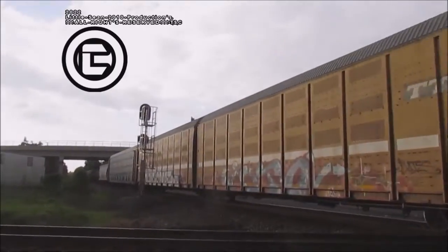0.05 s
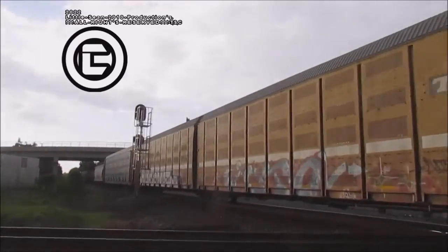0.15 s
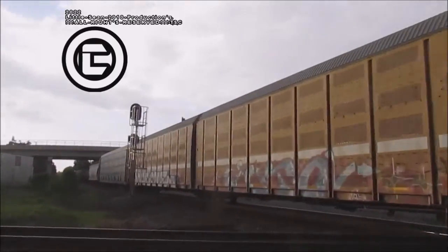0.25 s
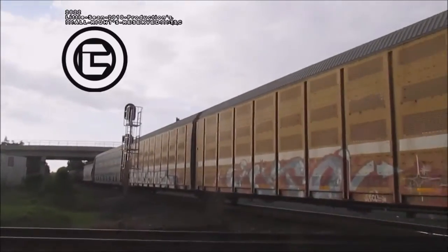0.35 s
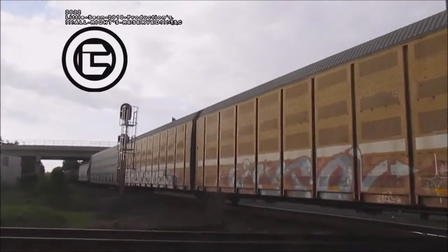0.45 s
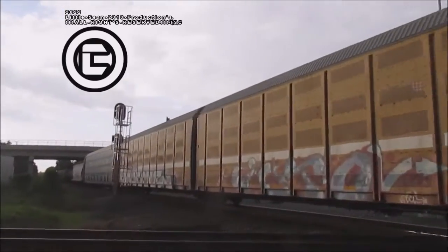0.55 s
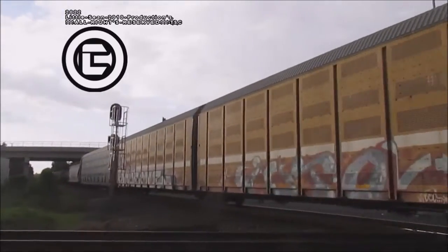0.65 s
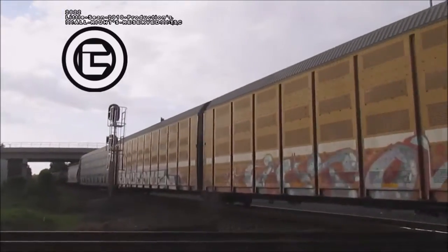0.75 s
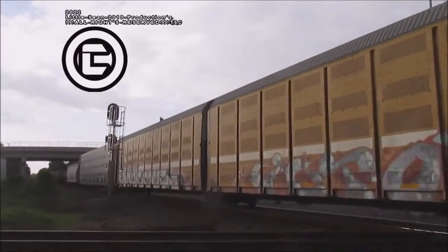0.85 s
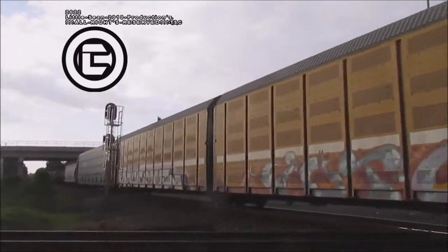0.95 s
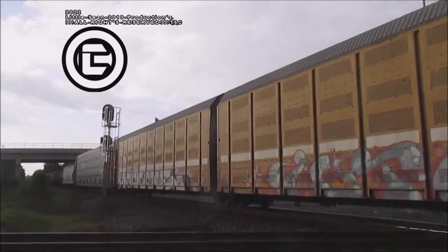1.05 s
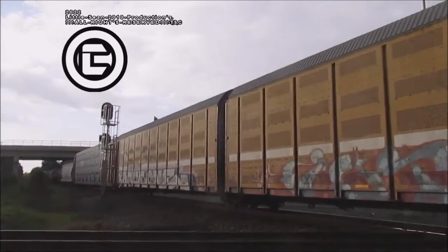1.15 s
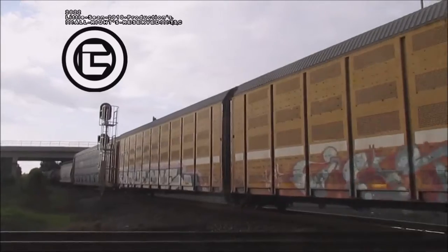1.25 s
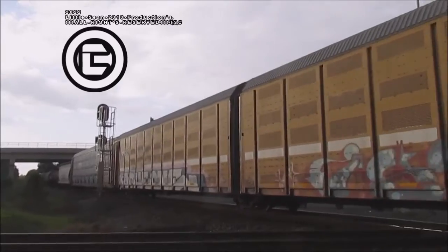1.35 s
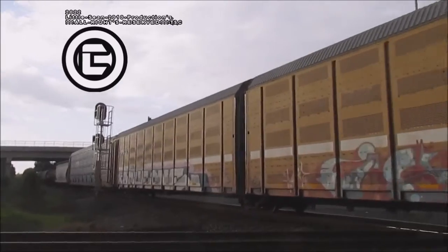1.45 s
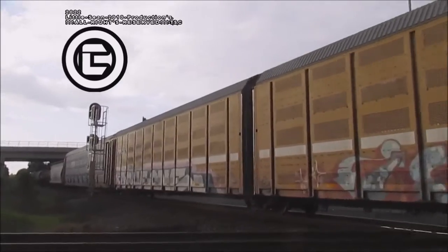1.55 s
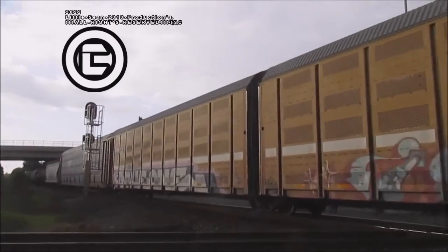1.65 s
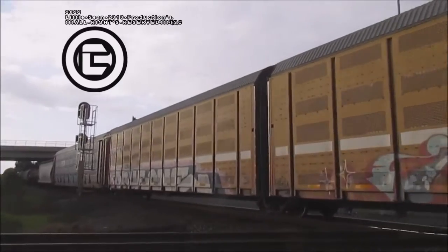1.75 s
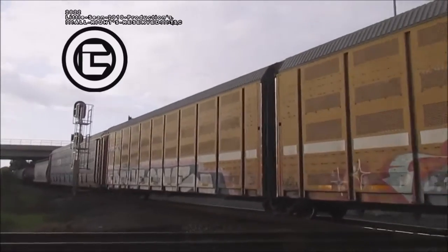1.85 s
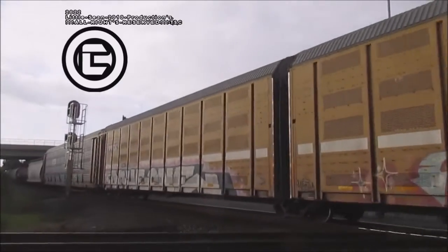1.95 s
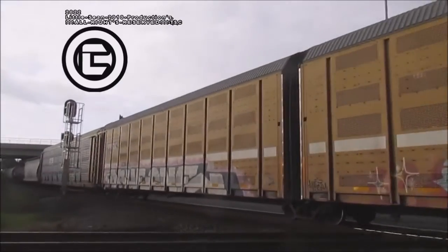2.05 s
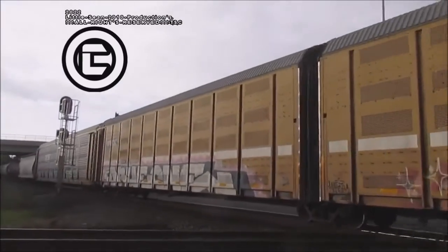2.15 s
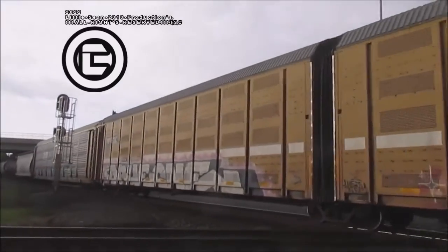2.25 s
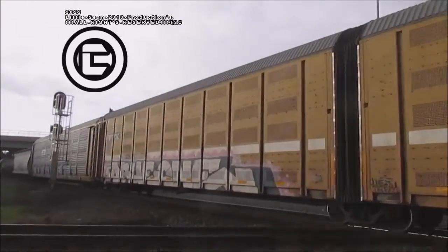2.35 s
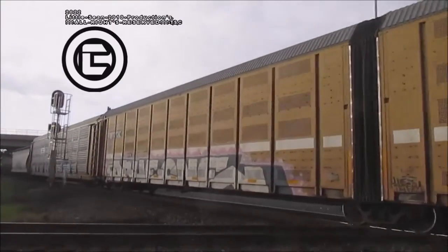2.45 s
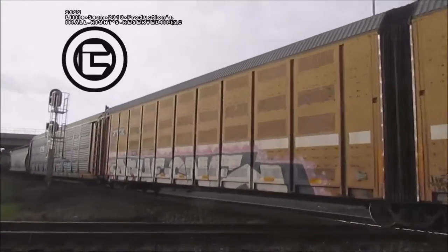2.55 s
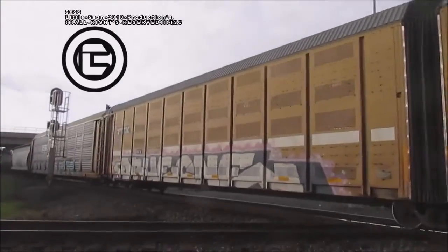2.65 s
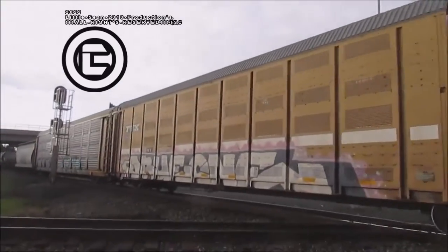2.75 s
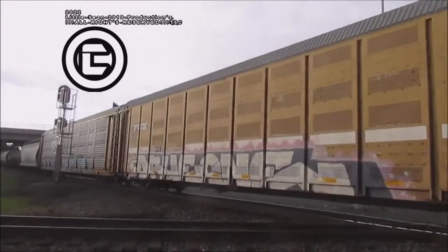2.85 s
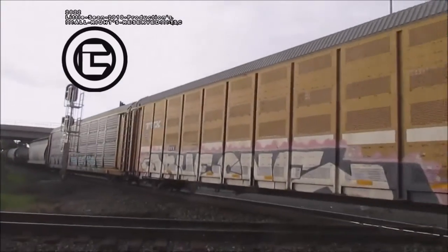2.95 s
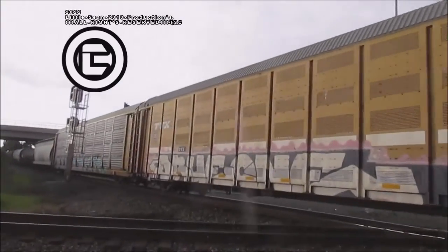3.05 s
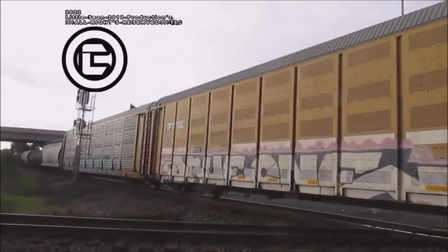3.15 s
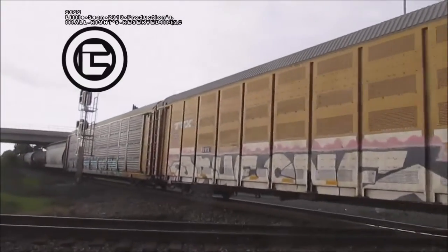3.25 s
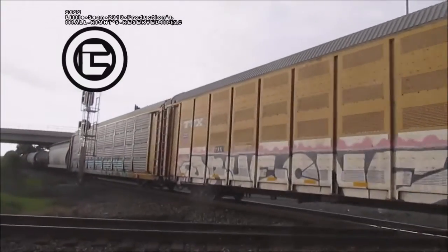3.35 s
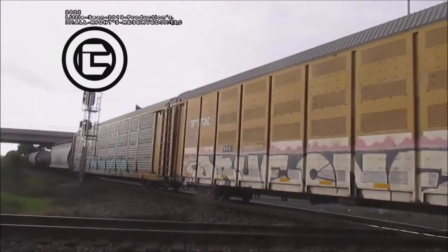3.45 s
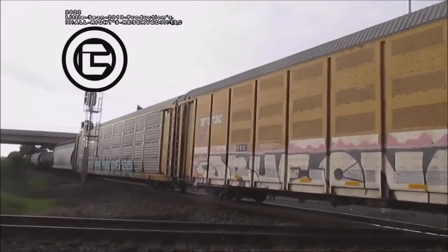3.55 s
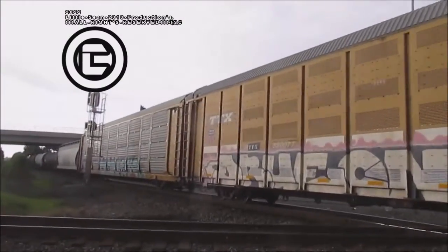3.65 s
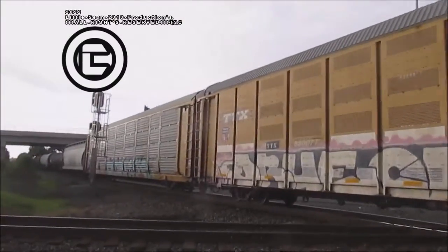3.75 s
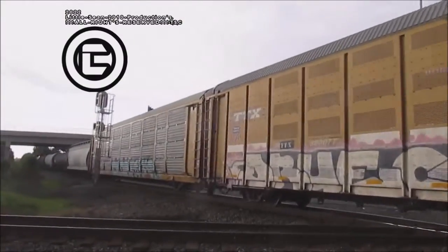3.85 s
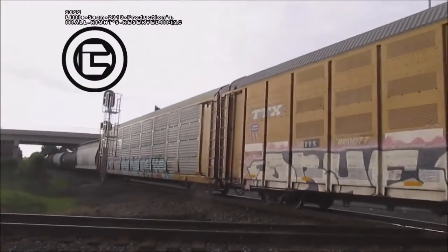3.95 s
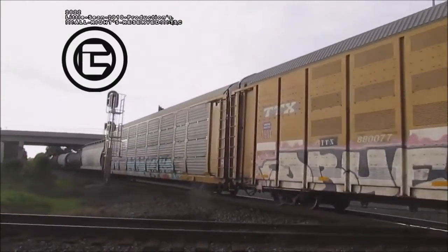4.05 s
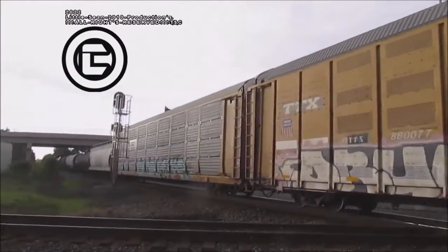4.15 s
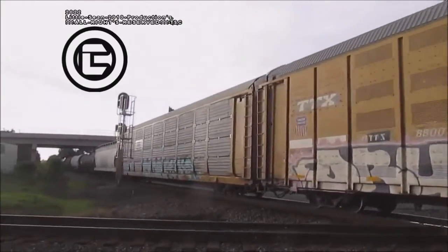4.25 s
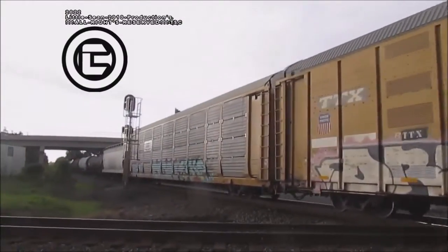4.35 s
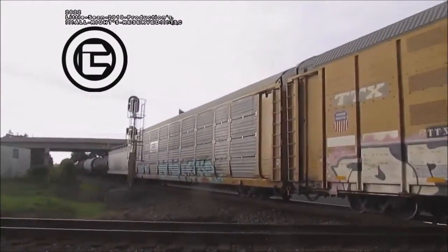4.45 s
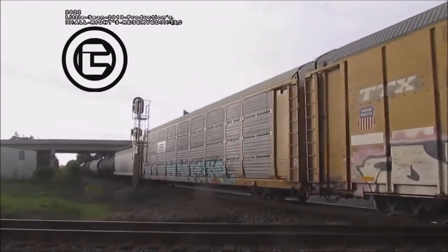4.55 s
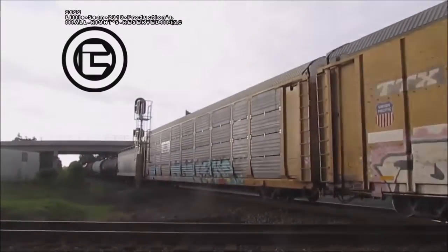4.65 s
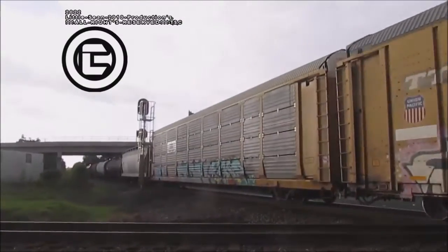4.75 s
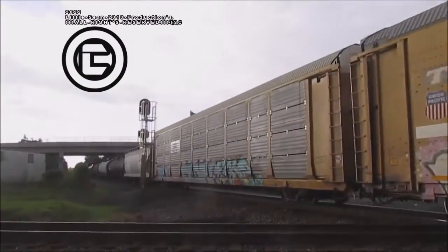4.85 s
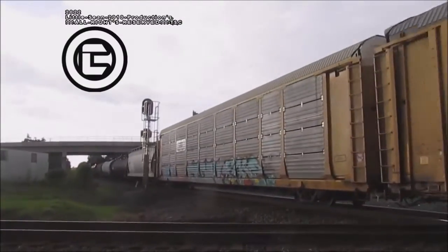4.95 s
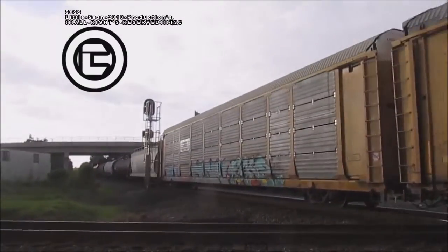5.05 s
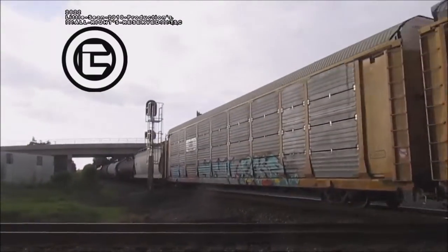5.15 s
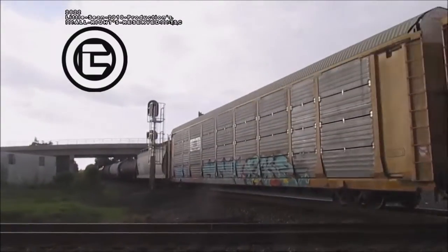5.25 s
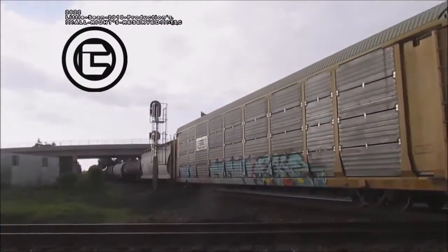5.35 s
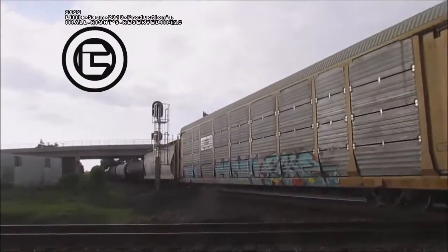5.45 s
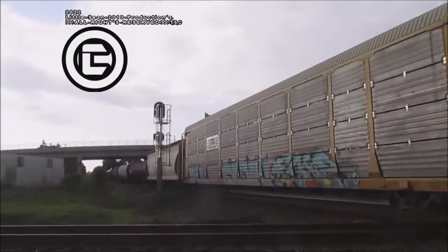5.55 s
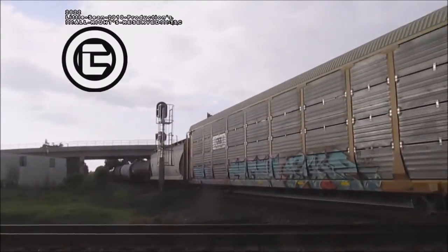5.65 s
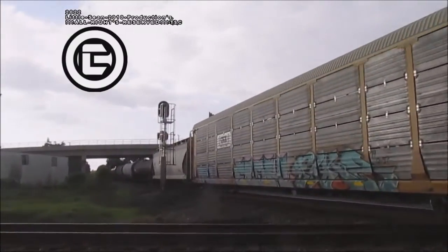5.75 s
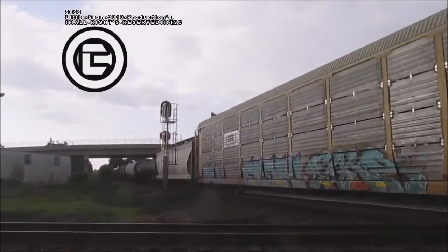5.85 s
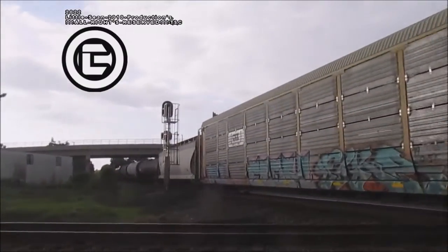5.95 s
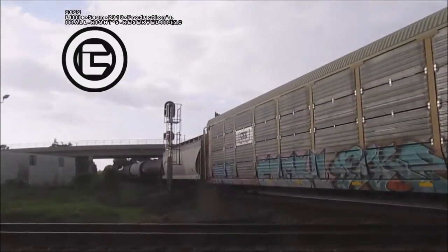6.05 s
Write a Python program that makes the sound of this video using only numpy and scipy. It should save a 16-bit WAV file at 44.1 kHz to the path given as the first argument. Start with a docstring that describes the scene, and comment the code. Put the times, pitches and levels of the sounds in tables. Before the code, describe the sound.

Close freight wagons rumble by outdoors, steel wheels clanging over rail gaps in repeated bursts, with screeching flanges and light chain rattles.

```python
"""A freight train of tall car carriers rolls over a rail crossing a few metres away.
Each group of bogies announces itself with a scrape of flanges sticking and slipping on the rail,
then its wheels hammer over the rail gaps: wagons thud, frames clang, the crossing rings.
Between the groups the wagons rumble on and push a deep swell of air; chains and grit rattle.
Two closely spaced microphones hear it from the right."""
import sys
import numpy as np
from scipy import signal
from scipy.fft import rfft, irfft, next_fast_len
from scipy.io import wavfile
from scipy.ndimage import map_coordinates

SR = 44100
rng = np.random.default_rng(int(sys.argv[2]) if len(sys.argv) > 2 else 0)


def put_to_file(sound):
    """Save the sound as 16-bit audio at rate SR, in the file named by the first command-line argument."""
    columns = np.atleast_2d(sound).T  # one column per channel
    safe = np.clip(columns, -1, 1)
    whole_steps = np.round(safe * 32767)
    wavfile.write(sys.argv[1], SR, whole_steps.astype(np.int16))


N = 269010
TIME = np.arange(N) / SR
FFT_SIZE = next_fast_len(N, real=True)
FREQS = np.maximum(np.arange(FFT_SIZE // 2 + 1) * SR / FFT_SIZE, 1)

# a pair of coupled bogies rolls by: (arrives [s], leaves [s], wheel roar [dB], rail hiss [dB])
BOGIE_PASSES = [(0.0, 0.523, -27.5, -36), (2.394, 2.94, -26, -29.5), (4.79, 5.268, -21.5, -28),
                (5.8, 6.1, -25.5, -26.5)]
# how hard the wagons shake: (time [s], level [dB])
WAGON_SHAKING = [(0.0, -25), (0.37, -22.5), (0.95, -31), (2.04, -34.5), (2.58, -21), (3.31, -28),
                 (4.21, -30), (4.99, -21.5), (5.64, -24), (6.1, -26.5)]
# steel knocks on a bogie frame: (time [s], lowest mode [Hz], level [dB], rail ring [dB])
FRAME_KNOCKS = [(0.002, 614, -16, -22), (0.107, 613, -15.5, -28), (0.192, 548, -13, -28),
                (0.222, 745, -27, -24), (0.323, 746, -14, -28), (0.331, 700, -12.5, -28),
                (0.423, 700, -25, -28), (0.445, 640, -20, -30), (0.534, 730, -22, -22),
                (0.553, 726, -14.5, -33), (2.334, 650, -20, -22.5), (2.432, 650, -20, -40),
                (2.558, 830, -19, -21), (2.588, 616, -18, -32), (2.644, 720, -14, -34),
                (2.767, 650, -20, -25), (2.868, 678, -9, -25), (2.897, 690, -19, -27),
                (4.342, 1290, -26, -50), (4.4, 1275, -25, -39), (4.704, 690, -23, -20),
                (4.918, 650, -20, -23), (4.944, 784, -18, -19), (5.022, 680, -20, -24),
                (5.149, 614, -17, -28), (5.261, 710, -12, -38), (5.786, 660, -14, -24),
                (5.884, 610, -23, -29), (5.902, 700, -16, -30), (5.995, 606, -18, -21)]


def from_db(db):
    """Decibels to gain."""
    return 10 ** (np.asarray(db) / 20)


def unit_rms(x):
    """Scale to an rms of 1."""
    return x / np.sqrt(np.mean(x ** 2) + 1e-20)


def over_hz(points):
    """Read a (frequency, value) curve along a log-frequency axis."""
    hz, value = np.transpose(points)
    return np.interp(np.log(FREQS), np.log(hz), value)


def colour(points):
    """Gain of an EQ curve, rolling off beyond its ends."""
    inside = np.minimum(FREQS / points[0][0], 1) * np.minimum(points[-1][0] / FREQS, 1)
    return from_db(over_hz(points)) * inside ** 2


def resonances(modes):
    """Power gain of a set of (frequency, width, level) peaks."""
    return sum(from_db(db) ** 2 / (1 + (2 * (FREQS - hz) / width) ** 2) for hz, width, db in modes)


def steel(ripple_db, spacing_hz):
    """Large steel parts have crowds of narrow modes: a rippled EQ that flattens out in the bass."""
    knots = np.cumsum(rng.uniform(.5, 1.5, 4000)) * spacing_hz
    ripple = np.interp(FREQS, knots, np.minimum(rng.standard_normal(4000), 2.5))
    return from_db(ripple_db * ripple * np.minimum(FREQS / 600, 1))


def drift(rate_hz):
    """Smooth random modulation of rms 1."""
    smooth = irfft(rfft(rng.standard_normal(FFT_SIZE)) / (1 + (FREQS / rate_hz) ** 2))
    return unit_rms(smooth[:N])


def stereo_noise(gain):
    """Coloured noise of rms 1 at the two microphones, wider in the treble."""
    # likeness of left and right: (frequency [Hz], correlation [0-1])
    likeness = [(30, .88), (200, .92), (700, .89), (1300, .8), (2600, .73), (4500, .54), (8000, .45),
                (15000, .25)]
    alike = np.clip(over_hz(likeness), 0, .99)
    mid, side = rng.standard_normal((2, 2 * len(FREQS))).view(complex)   # two white spectra
    mid, side = mid * (gain * np.sqrt(1 + alike)), side * (gain * np.sqrt(1 - alike))
    return unit_rms(irfft(np.array([mid + side, mid - side], np.complex64))[:, :N])


def swell(start, rise, hold, t60):
    """Envelope that rises, holds, then dies away exponentially; times in seconds."""
    out = np.zeros(N)
    live = slice(*np.searchsorted(TIME, [start, start + rise + hold + t60]))
    age = TIME[live] - start
    out[live] = np.clip(age / rise, 0, 1) * from_db(-60 * np.maximum(age - rise - hold, 0) / t60)
    return out


def chatter(per_s, t60, share):
    """Loose parts knock at random: a gain of rms 1, small sharp bursts over a steady bed."""
    ticks = (rng.random(N) < per_s / SR) * np.minimum(rng.exponential(1, N), 3) ** 2
    power = signal.lfilter([1], [1, -from_db(-120 / (t60 * SR))], ticks + 1e-18)
    return np.sqrt(1 - share + share * power / power.mean())


def ring(clicks, hz, t60):
    """One mode: a unit click sets a sine of height 1 ringing."""
    radius, angle = from_db(-60 / (t60 * SR)), 2 * np.pi * hz / SR
    poles = [1, -2 * radius * np.cos(angle), radius * radius]
    return signal.lfilter([0, np.sin(angle)], poles, clicks + 1e-18)


def struck(start, hz, rise, t60):
    """A heavy part, hit once, swings as a damped sine."""
    out = swell(start, rise, 0, t60)
    live = np.flatnonzero(out)
    out[live] *= np.sin(2 * np.pi * hz * (TIME[live] - start))
    return out


def roar_envelope(speed_m_per_s=21.5, distance_m=1.344, spreading=0.83):
    """The wheel roar is full while a pair of bogies is abreast and fades with its distance."""
    power = 0
    for arrives, leaves, db, _ in BOGIE_PASSES:
        along_m = speed_m_per_s * (TIME - np.clip(TIME, arrives, leaves))
        nearness = distance_m / np.hypot(distance_m, along_m)
        power += (from_db(db) * nearness ** spreading) ** 2
    return np.sqrt(power)


def hiss_envelope(rise_db_per_s=78, fall_db_per_s=18, floor_db=-72):
    """The rail carries its hiss a little ahead of each pair of bogies and far behind it."""
    power = from_db(floor_db) ** 2
    for arrives, leaves, _, db in BOGIE_PASSES:
        ahead_db = rise_db_per_s * np.maximum(arrives - TIME, 0)
        behind_db = fall_db_per_s * np.maximum(TIME - leaves, 0)
        power += from_db(db - ahead_db - behind_db) ** 2
    return np.sqrt(power)


def rolling(rumble_db, roar_db, hiss_db, waver_db=1.1):
    """Rough treads on rough rail: the wagons rumble, the wheels roar, the worn rail hisses unevenly."""
    # tone of wagons, wheels and rail: (frequency [Hz], level [dB])
    rumble_eq = [(42, -7.5), (58, -2), (105, 0), (150, -3.5), (250, -4), (320, -6.5), (430, -16),
                 (900, -21.5)]
    roar_eq = [(250, -45), (420, -3.5), (680, 3), (1000, -5.5), (1300, -4), (1700, -5), (2600, -10),
               (4000, -10.5), (6000, -23), (10000, -30)]
    hiss_eq = [(2000, 9.5), (4000, 11.5), (6500, 7.5), (8000, 7.5), (10300, 9.5), (12500, 2.5),
               (15500, -11)]
    shaking_db = np.interp(TIME, *np.transpose(WAGON_SHAKING))
    rail = steel(ripple_db=2.4, spacing_hz=28)
    rumble = from_db(shaking_db + rumble_db) * stereo_noise(colour(rumble_eq))
    roar = roar_envelope() * from_db(roar_db) * stereo_noise(colour(roar_eq) * rail)
    roar *= chatter(per_s=63, t60=0.056, share=0.13)
    hiss = hiss_envelope() * from_db(hiss_db) * stereo_noise(colour(hiss_eq) * rail)
    hiss *= chatter(per_s=70, t60=0.14, share=0.22)
    return rumble + roar + hiss * from_db(waver_db * drift(16))


def draught(sway_db, gust_db, follows=0.36):
    """The shaking wagon sides push a slow, deep swell of air; an open wagon end adds a gust."""
    # sub-bass of the moving air: (frequency [Hz], level [dB])
    air_eq = [(16, -19), (26, -2), (38, 17), (48, -12)]
    shaking_db = np.interp(TIME, *np.transpose(WAGON_SHAKING))
    sway = from_db(sway_db + follows * (shaking_db - shaking_db.mean()))
    gust = from_db(gust_db) * swell(start=4.57, rise=0.45, hold=0.18, t60=2.3)
    return np.hypot(sway, gust) * stereo_noise(colour(air_eq))


def far_wagons():
    """The long line of wagons further off booms, swelling and sinking slowly."""
    # tone of the boom: (frequency [Hz], level [dB])
    boom_eq = [(45, 0), (70, -1.5), (120, -3.5), (160, -13.5)]
    # its rise and fall: (time [s], level [dB])
    boom_levels = [(0.0, -43), (0.8, -46), (1.4, -43.5), (2.25, -32), (3.0, -38), (3.7, -33.5), (4.4, -36),
                   (5.0, -45), (6.1, -34)]
    return from_db(np.interp(TIME, *np.transpose(boom_levels))) * stereo_noise(colour(boom_eq))


def fittings(level_db, per_s, t60):
    """Chains and brake rigging tick and jingle, the harder the louder the rail hisses."""
    # modes of small loose steel parts: (frequency [Hz])
    pitches = [3900, 4300, 4700, 5100, 5600, 6100, 6700, 7300, 8300, 8700, 9100, 9500, 9900, 10400, 10900,
               11700, 12600, 13500, 14400]
    at = np.flatnonzero(rng.random(N) < per_s / SR)
    force = rng.uniform(.3, 1, len(at))
    out = np.zeros((2, N))
    for hz in pitches:
        clicks = np.zeros((2, N))
        clicks[:, at] = force * rng.standard_normal((2, len(at)))
        out += ring(clicks, hz, t60)
    return unit_rms(out) * hiss_envelope() * from_db(level_db)


def wheel_singing(waver_hz, flutter_db, sharp_hz=30, settle_s=.015):
    """Stick and slip keeps one wheel mode going: an almost pure tone that starts sharp and settles."""
    # a wheel locks into a mode: (start [s], hold [s], pitch [Hz], level [dB])
    notes = [(0.008, 0.042, 2914, -28.5), (0.0, 0.072, 3640, -35), (0.02, .11, 12100, -49),
             (0.57, .04, 3320, -42), (1.32, 0.14, 12000, -68), (2.252, 0.04, 2978, -26.5),
             (2.314, 0.08, 2960, -32), (2.358, 0.052, 2000, -32), (2.366, .1, 3195, -42),
             (2.444, 0.13, 3910, -39), (2.517, 0.052, 2965, -27.5), (2.56, 0.1, 9200, -38),
             (2.56, 0.079, 10230, -36), (2.7, 0.039, 3180, -31), (2.765, .09, 3310, -35),
             (2.768, 0.044, 2450, -35), (2.888, 0.044, 3400, -37), (4.577, 0.014, 3220, -30),
             (4.622, .02, 1825, -29.5), (6.01, .08, 11200, -40), (6.02, .08, 10740, -36.5)]
    waver_cycles = np.cumsum(waver_hz * drift(48)) / SR
    tones = np.zeros(N)
    for start, hold, hz, db in notes:
        envelope = swell(start, rise=0.0039, hold=hold, t60=0.15)
        live = envelope > 0
        pitch = hz + sharp_hz * np.exp((start - TIME[live]) / settle_s)
        cycles = np.cumsum(pitch) / SR + waver_cycles[live]
        tones[live] += from_db(db) * envelope[live] * np.sin(2 * np.pi * cycles)
    return np.sqrt(2) * tones * from_db(flutter_db * drift(50))


def blow_envelope(hits, levels_db, t60, rebound_s=0.024):
    """Each wheel drops into the gap, then rebounds onto the far rail end."""
    power = np.zeros(N)
    for (start, *_, rise, rebound_db), db in zip(hits, levels_db):
        ring_s = t60 * from_db(0.26 * (db - levels_db.max()))   # light blows die sooner
        power += (from_db(db) * swell(start, rise, 0, ring_s)) ** 2
        power += (from_db(db + rebound_db) * swell(start + rebound_s, rise, 0, ring_s)) ** 2
    return np.sqrt(power)


def frame_ring(times, levels_db, modes, lag_s=0.01188, scatter_db=1.5):
    """Just after a wheel drops, the frame's low modes ring, each with a strength of its own."""
    at = np.clip((times + lag_s) * SR, 0, N - 1).astype(int)
    scatter = scatter_db * rng.standard_normal((len(at), len(modes)))
    out = np.zeros(N)
    for k, (hz, db, t60) in enumerate(modes):
        clicks = np.zeros(N)
        clicks[at] = from_db(levels_db + db + scatter[:, k])
        out += (-1) ** k * ring(clicks, hz, t60)
    return out


def wheel_strikes(thud_db, clang_db, crack_db, panel_db, frame_db):
    """A blow thuds in the wagon, clangs in its bogie and the side panels, cracks in wheel and rail."""
    # wheels drop into the gaps: (time [s], clang [dB], thud [dB], crack [dB], rise [s], rebound [dB])
    drops = [(0.001, -15, -16, -25, 0.00069, -7.5), (0.093, -16, -19, -28.5, .004, -8),
             (0.192, -12.5, -16, -23.5, .003, -2.5), (0.299, -14.5, -18.5, -29, 0.0071, -1),
             (0.418, -16, -16, -27, 0.0051, -6), (0.52, -14.5, -13.5, -29.5, .01, -5.5),
             (1.244, -46, -36.5, -72, .003, -8), (1.972, -34, -30, -53, 0.0033, 1),
             (2.033, -31, -25, -43.5, 0.0052, -6), (2.328, -12, -16.5, -23, .005, -13),
             (2.427, -15, -18.5, -26.5, 0.0057, 0), (2.531, -13.5, -15, -25.5, 0.0054, 0.5),
             (2.636, -12.5, -21, -24.5, 0.0062, -3), (2.759, -15, -16.5, -26, 0.0085, -2.5),
             (2.868, -14, -15.5, -26, 0.0032, -1), (3.236, -31.5, -21.5, -41, 0.0065, -3),
             (3.642, -38, -28.5, -54, 0.0044, -5), (4.152, -33.5, -33, -43.5, 0.016, 2),
             (4.342, -24, -25.5, -57, .003, -9), (4.399, -22.5, -21.5, -39.5, 0.0026, -5),
             (4.698, -10, -10.5, -22.5, 0.0037, -11), (4.805, -17.5, -15.5, -27, .008, -5),
             (4.91, -13.5, -22, -21, 0.0048, -3.5), (5.016, -12.5, -16, -24.5, 0.0086, -0.5),
             (5.148, -16.5, -18, -25, 0.0036, -5), (5.255, -15.5, -26, -26.5, .008, -4),
             (5.773, -13, -19, -23.5, 0.0054, -16), (5.881, -11, -15.5, -28, 0.0026, -17),
             (5.986, -11, -13, -24, 0.0063, -2.5), (6.089, -10, -31, -28, 0.0088, -5)]
    # tone of thud, side panels, crack and the whole clang: (frequency [Hz], level [dB])
    thud_eq = [(35, -5), (70, -7), (110, 1.5), (190, 4.5), (280, -2.5), (400, -16), (600, -28)]
    panel_eq = [(250, -27), (420, -1), (650, 0), (800, 2), (1000, -9.5), (1300, 1.5), (1600, -11),
                (2000, -6), (3200, -57), (6000, -10)]
    crack_eq = [(1000, -63), (2200, 0.5), (3500, 2), (5200, 0), (8000, -6), (10000, -5), (12500, -9),
                (15500, -22)]
    clang_eq = [(400, -1.3), (580, -1), (2500, -1.5), (4500, 0.14)]
    # clang resonances of each pair of bogies: (frequency [Hz], width [Hz], level [dB])
    first_pair = [(570, 200, 1.5), (1133, 56, 0), (1750, 120, -5), (2380, 42, -22), (2780, 120, -5),
                  (3220, 130, -4)]
    second_pair = [(650, 94, 5), (875, 21, 2.5), (1290, 180, 0), (1830, 110, -0.5), (2000, 36, -10),
                   (2480, 60, -7), (3000, 24, -8), (3180, 40, -3), (4060, 80, -9.5)]
    third_pair = [(700, 220, -3), (1080, 40, -13), (1290, 52, -1), (1750, 200, -4.5), (2000, 71, -4),
                  (2440, 110, -1), (2590, 79, -14), (3360, 79, -11)]
    fourth_pair = [(670, 180, -8), (1230, 49, -14), (2080, 140, -3.5), (3250, 56, -6)]
    # low modes of frame and wagon floor, pair by pair: (frequency [Hz], level [dB], t60 [s])
    low_modes = [
        [(98, -8, 0.11), (165, -13, 0.26), (206.5, -4.5, 0.22), (299, -6, 0.5), (630, -16, 1),
         (690, -13.5, 0.98), (774, -13, 0.18)],
        [(85, -14, 0.44), (134, 6, 0.042), (192, 1, 0.046), (265.6, -7, 0.45), (557, -14, 0.17),
         (606, -36, 0.15), (740, -36, 0.13)],
        [(78, 4, 0.082), (124, -16, 0.33), (164, -1, 0.11), (242, -28, 0.23), (280.6, -1.5, 0.25),
         (557, -10, 0.16), (716, -28, 0.22)],
        [(72, -27, 0.18), (124, -7, 0.24), (157, -4, 0.13), (188.3, -1, 0.58), (249, -3, 0.54),
         (305, -8.5, 0.46), (523, -13, 0.48)],
    ]
    # the next pair takes over the crossing: (time [s])
    handovers = [1.5, 4.0, 5.6]
    all_hits = np.array(drops)
    pair = np.searchsorted(handovers, all_hits[:, 0])
    metal, ringing = 0, 0
    for k, modes in enumerate([first_pair, second_pair, third_pair, fourth_pair]):
        hits = all_hits[pair == k]
        times, clangs, thuds, cracks = hits.T[:4]
        ripple = steel(ripple_db=3.2, spacing_hz=50)
        panels = from_db(panel_db) * colour(panel_eq)
        body = np.sqrt(resonances(modes) + panels ** 2) * colour(clang_eq) * np.sqrt(ripple)
        clang = blow_envelope(hits, clangs + clang_db, t60=0.37) * stereo_noise(body)
        edge = colour(crack_eq) * ripple
        crack = blow_envelope(hits, cracks + crack_db, t60=0.49) * stereo_noise(edge)
        metal += clang + crack
        ringing += frame_ring(times, thuds + frame_db, low_modes[k])
    thud = blow_envelope(all_hits, all_hits[:, 2] + thud_db, t60=0.39) * stereo_noise(colour(thud_eq))
    return thud + metal * chatter(per_s=380, t60=0.023, share=0.029) + ringing


def steel_knocks(level_db):
    """Steel hits the bogie frame: short, hard knocks that stand out of the clatter."""
    # modes of the struck part: (ratio to the lowest mode, level [dB], t60 [s])
    modes = [(0.999, 0, 0.072), (1.9, -16, 0.034), (2.7, -13, 0.026), (4.7, -14, .03)]
    return sum(from_db(db + level_db + mode_db) * struck(start, hz * ratio, rise=1 / hz, t60=t60)
               for start, hz, db, _ in FRAME_KNOCKS for ratio, mode_db, t60 in modes)


def rail_ring(level_db, max_delay_s=.003):
    """Each knock sets the crossing ringing, every mode with its own strength and slight delay."""
    # modes of the crossing's steel: (frequency [Hz], level [dB], t60 [s])
    modes = [(628.6, -0.5, 0.15), (763, -1.5, 0.24), (1140, -3, .06), (1280, 0, .06), (1406, -5, .05),
             (1730, -0.5, 0.073), (1883, -3, .07), (2120, -9, .05), (2450, 0, 0.072), (2680, -1, .05),
             (3260, -3, 0.083), (3620, -9, 0.045), (4020, 2, 0.069), (4360, 3, 0.036), (5150, -12, .04),
             (6000, -6, .04)]
    times, _, _, ring_db = np.transpose(FRAME_KNOCKS)
    delay, strength = rng.random((len(times), len(modes), 2)).T
    out = np.zeros(N)
    for k, (hz, db, t60) in enumerate(modes):
        at = np.clip((times + max_delay_s * delay[k]) * SR, 0, N - 1).astype(int)
        clicks = np.zeros(N)
        clicks[at] = from_db(ring_db + db + level_db) * (.5 + strength[k])
        out += ring(clicks, hz, t60)
    return out


def load_thumps(level_db):
    """The wagon's weight lands on a spring with one deep thump."""
    # landings: (time [s], pitch [Hz], level [dB])
    thumps = [(0.216, 134, -8), (0.307, 193, -28), (0.336, 293, -12.5), (0.424, 188, -12), (0.54, 233, -10),
              (0.556, 207, -14), (2.3306, 175, -1), (2.426, 138, -5.5), (2.542, 139, -26),
              (2.563, 200, -9.5), (2.651, 277, -10), (2.69, 227, -11.5), (3.235, 213, -25),
              (3.643, 118, -15), (4.686, 114, -4), (4.701, 198, -2.5), (4.723, 115, -17),
              (4.911, 174, -5.5), (4.939, 133, -5.5), (5.145, 111, -11.5), (5.994, 140, -23),
              (6.019, 238, -10.5)]
    return sum(from_db(db + level_db) * struck(start, hz, rise=0.003, t60=0.05)
               for start, hz, db in thumps)


def flange_scrapes(rubbing_db, unsteady_db):
    """Stick and slip of a flange drives its wheel's resonances and crushes grit on the rail."""
    # flange contacts: (start [s], rise [s], hold [s], t60 [s], level [dB], pan L-R [dB], voice)
    scrapes = [(0.517, .01, 0.17, 0.69, -38.5, 2, "sizzle"), (0.52, .005, 0.023, 0.21, -33, 3, "spit"),
               (1.785, .01, .17, .7, -52, -1, "rasp"), (1.982, 0.078, 0.08, .5, -48.5, 4, "sizzle"),
               (2.178, .005, 0.11, 0.98, -29.5, -2, "rasp"), (2.181, .005, 0.49, 1, -37, 6, "spit"),
               (2.234, 0.018, 0.011, 0.23, -23, 0, "shriek"), (2.29, 0.044, 0.05, .5, -27, 1, "skirl"),
               (2.48, 0.035, 0.041, 0.77, -23, -2, "rasp"), (2.994, .01, 0.028, 0.59, -35, 13, "rasp"),
               (3.17, 0.054, .07, .9, -44.5, 6, "graze"), (4.233, 0.042, 0.17, 0.77, -45, 2, "graze"),
               (4.583, 0.011, .01, .2, -32.5, 0, "rasp"), (4.605, 0.0069, 0.023, 0.76, -18, 1.5, "screech"),
               (4.606, .005, .02, .3, -37, 2, "spit"), (5.38, .03, 0.093, 0.68, -39.5, 13, "screech"),
               (5.62, 0.0073, .02, .4, -38, -4, "spit"), (5.683, 0.028, 0.06, 0.99, -22.5, 3, "squeal"),
               (5.7, 0.057, 0.026, 0.71, -23, -1, "spit"), (5.954, 0.018, 0.075, .76, -24, 0, "whine"),
               (5.979, .005, 0.0068, .15, -24, -3, "spit")]
    # wheel resonances for each voice: (frequency [Hz], width [Hz], level [dB])
    wheels = {"shriek": [(2990, 50, 3), (3980, 80, -2), (5200, 300, -11), (5680, 240, 0), (11300, 120, -10),
              (12600, 200, -9), (13400, 200, -9)], "skirl": [(3980, 81, -3), (6070, 60, 0), (9300, 80, -4),
              (12300, 120, -11), (13200, 120, -8)], "screech": [(1370, 120, -1.5), (1840, 120, 3),
              (2640, 140, 0), (3930, 44, 4.5), (4180, 50, -1), (5030, 1400, -5.5), (8400, 180, -1.5),
              (9370, 160, 1), (9840, 200, 3), (10500, 180, -0.5), (13700, 90, -9)],
              "squeal": [(2100, 220, -5), (8200, 300, -8), (9050, 200, -8), (10250, 180, -1),
              (10600, 120, -5), (11600, 120, -5), (12400, 120, -10)], "whine": [(8200, 220, 2),
              (9000, 300, -4), (9950, 200, -3), (10750, 200, 2), (11250, 220, 5), (12200, 200, -4)],
              "spit": [(11200, 600, -6), (12200, 700, -5), (13400, 460, -9), (14200, 460, -9),
              (15100, 600, -17)], "sizzle": [(8600, 300, -2), (11280, 380, 9), (11720, 250, 8)],
              "graze": [(3330, 200, -1), (9200, 500, -14), (10200, 450, -7)], "rasp": [(3300, 830, -24),
              (5030, 4000, -3.5), (9200, 590, -4.5), (10300, 700, -15), (11500, 800, -5),
              (13100, 1000, -18)]}
    # broad gritty rubbing between the resonances: (frequency [Hz], level [dB])
    rubbing_eq = [(800, -33), (1800, -21), (5000, -20), (10000, -17), (13000, -21), (15500, -27)]
    # voices whose light touch comes and goes: (voice, level spread [dB])
    sputter_db = {"sizzle": 2.5, "graze": 2.5}
    rubbing = from_db(rubbing_db) * colour(rubbing_eq)
    sides = np.array([[.5], [-.5]])
    out = np.zeros((2, N))
    for name, modes in wheels.items():
        grip = sum(from_db(db + pan * sides) * swell(start, rise, hold, t60)
                   for start, rise, hold, t60, db, pan, voice in scrapes if voice == name)
        if name in sputter_db:
            grip *= unit_rms(from_db(sputter_db[name] * np.minimum(drift(60), 2)))
        wheel = steel(ripple_db=3.5, spacing_hz=45) * np.sqrt(resonances(modes) + rubbing ** 2)
        out += grip * stereo_noise(wheel)
    unsteady = from_db(unsteady_db * drift(70))
    crushed_grit = chatter(per_s=300, t60=0.019, share=0.15)
    return out * unsteady * crushed_grit


def rattles(level_db):
    """Grit spat from under a wheel and slack chain rattle in short bursts of tiny contacts."""
    # bursts between the bogies: (time [s], level [dB], material)
    cues = [(0.686, -42, "grit"), (0.719, -41, "grit"), (0.778, -45, "grit"), (0.828, -43, "grit"),
            (0.881, -45, "grit"), (1.046, -56.5, "grit"), (1.098, -47, "grit"), (1.452, -57, "chain"),
            (1.503, -58, "chain"), (1.812, -44, "grit"), (1.84, -52, "grit"), (1.868, -50, "grit"),
            (1.926, -49, "grit"), (2.085, -41.5, "chain"), (3.376, -46, "chain"), (3.426, -48, "chain"),
            (3.513, -39, "chain"), (3.612, -44, "chain"), (3.705, -50, "chain"), (3.763, -52, "chain"),
            (3.821, -43.5, "chain"), (4.102, -43.5, "chain"), (4.27, -46, "chain"), (5.565, -34, "grit")]
    # decay and tone of grit and chain: (t60 [s], list of (frequency [Hz], level [dB]))
    materials = {"grit": (0.097, [(3500, -10), (7000, -13), (8800, -1), (11300, -1), (12600, -9),
                 (14000, -18)]), "chain": (0.3, [(4200, -9.5), (5900, 6), (7200, -1), (8800, -3),
                 (10400, -7), (13000, -4), (15000, -12)])}
    out = 0
    for name, (t60, eq) in materials.items():
        bursts = sum(from_db(db + level_db) * swell(start, rise=.009, hold=0, t60=t60)
                     for start, db, material in cues if material == name)
        out += bursts * stereo_noise(colour(eq) * steel(ripple_db=2.5, spacing_hz=110))
    return out * chatter(per_s=600, t60=.012, share=.3)


def flange_squeal(level_db, slip_jitter=.013):
    """A flange sticks and slips about a thousand times a second; all partials waver with that rate."""
    # nearly harmonic partials: (frequency [Hz], level [dB])
    partials = [(2020, -33), (3005, -33), (3970, -36), (5000, -35), (6020, -38), (7040, -42), (8100, -44),
                (9080, -35), (10160, -32), (11210, -32), (12200, -32), (13270, -36)]
    envelope = swell(start=5.688, rise=0.012, hold=0.086, t60=0.25)
    live = np.flatnonzero(envelope)
    clock = (TIME + np.cumsum(slip_jitter * drift(150)) / SR)[live]
    out = np.zeros(N)
    out[live] = sum(from_db(db) * np.sin(2 * np.pi * (hz * clock + rng.random())) for hz, db in partials)
    return np.sqrt(2) * from_db(level_db) * envelope * out


def from_the_right(stereo):
    """Sound reaches the left microphone later, the more so the further the bogies have rolled."""
    # the nearest bogies move off until the next pair takes over: (time [s], left delay [ms])
    left_delay = [(0.0, 0.1), (1.5, 0.17), (2.15, 0.062), (3.1, 0.13), (4.2, 0.1), (5.62, 0.15),
                  (5.7, 0.12), (6.1, 0.14)]
    lag_samples = np.interp(TIME, *np.transpose(left_delay)) * SR / 1000
    left = map_coordinates(stereo[0], [np.arange(N) - lag_samples], order=5, mode="nearest")
    return np.array([left, stereo[1]])


def scene():
    """A rolling bed, jingling fittings, blows at the crossing, and wheels that scrape and sing."""
    bed = rolling(rumble_db=-1.0, roar_db=-2.5, hiss_db=-2.0)
    bed += draught(sway_db=-42.0, gust_db=-29) + far_wagons()
    jingle = fittings(level_db=-17.0, per_s=70, t60=0.029) + rattles(level_db=1.0)
    impacts = wheel_strikes(thud_db=-4.5, clang_db=-7.0, crack_db=3.0, panel_db=-4.0, frame_db=-4.5)
    impacts += steel_knocks(level_db=-2.0) + rail_ring(level_db=-3.0) + load_thumps(level_db=-1.5)
    friction = flange_scrapes(rubbing_db=4.0, unsteady_db=0.5) + flange_squeal(level_db=-1.5)
    friction += wheel_singing(waver_hz=7.0, flutter_db=0.5)
    return from_the_right(bed + jingle + impacts + friction)


def record(dry, notch_hz=7900, cutoff_hz=15750):
    """The two microphones differ in colour; a narrow treble notch, rounded peaks, the top cut."""
    # tonal balance of the pair: (frequency [Hz], L-R [dB])
    balance = [(30, 0), (280, 2.5), (550, -1), (1500, -0.8), (2300, -.5), (3200, -3), (4900, -5),
               (6300, 0.5), (8000, 1), (10000, 3.5), (12500, -2.5), (15000, -1)]
    tint = from_db(over_hz(balance) * np.array([[.5], [-.5]]))
    tinted = irfft(rfft(dry, FFT_SIZE) * tint)[:, :N]
    notched = signal.lfilter(*signal.iirnotch(notch_hz, Q=34, fs=SR), tinted)
    rounded = 1.5 * np.tanh(notched / 1.5)
    return signal.sosfilt(signal.ellip(12, .1, 90, cutoff_hz, fs=SR, output="sos"), rounded)


dry = scene()
out = record(dry)
put_to_file(out)
```